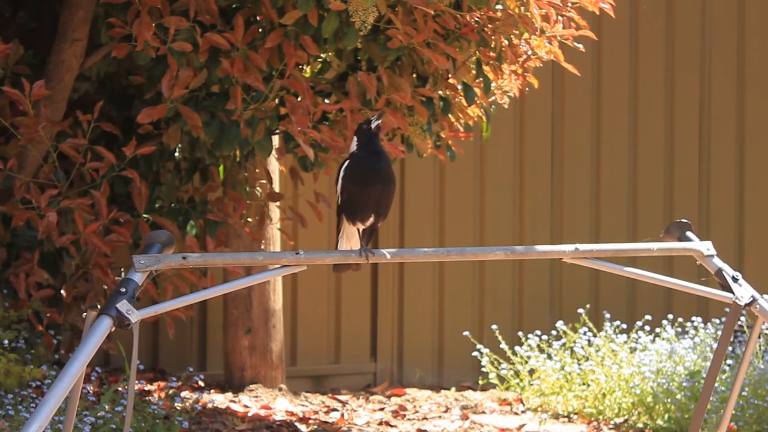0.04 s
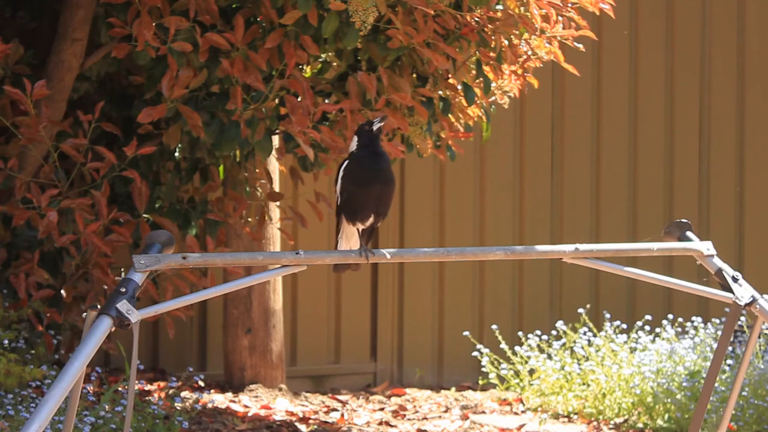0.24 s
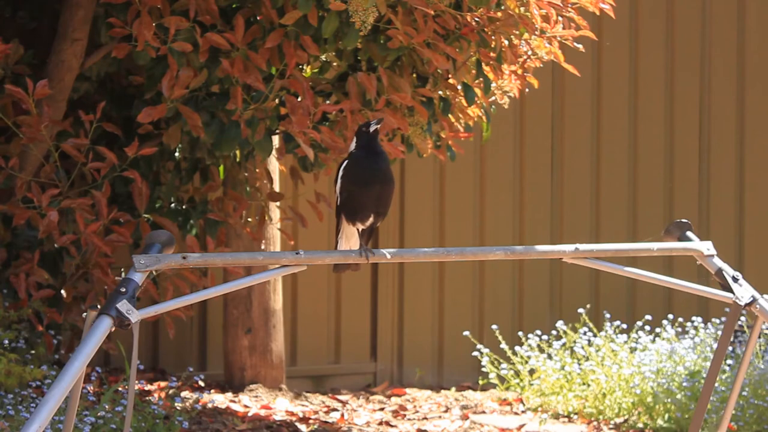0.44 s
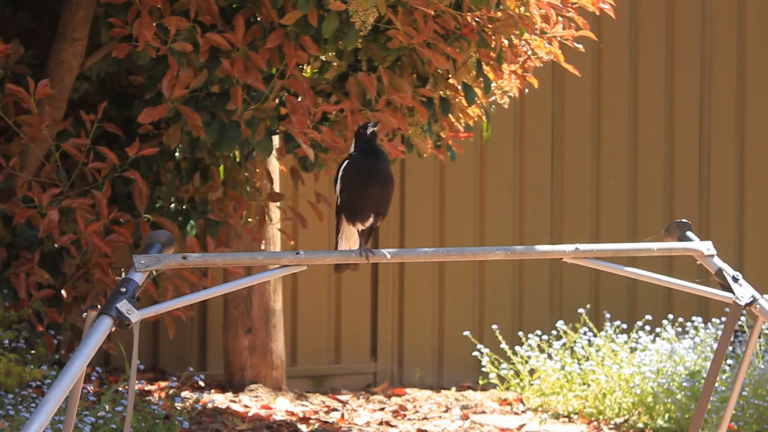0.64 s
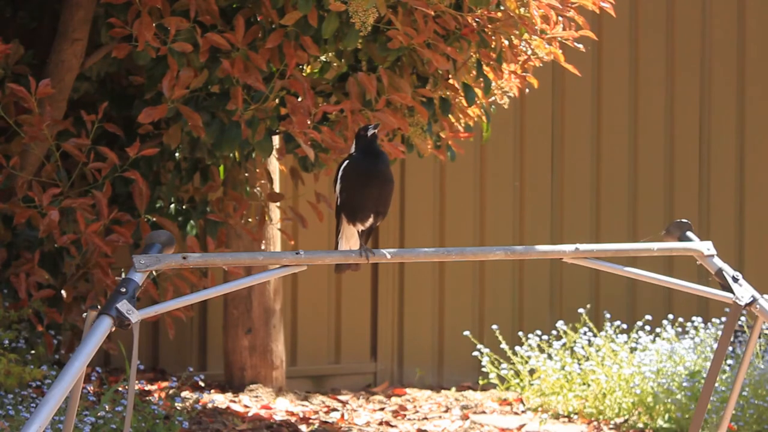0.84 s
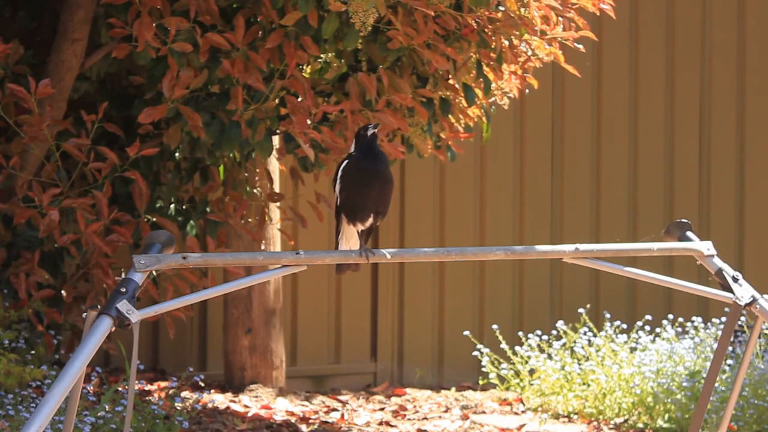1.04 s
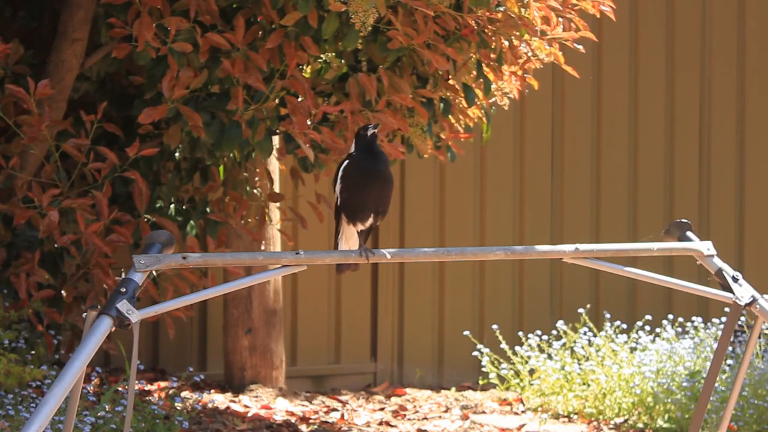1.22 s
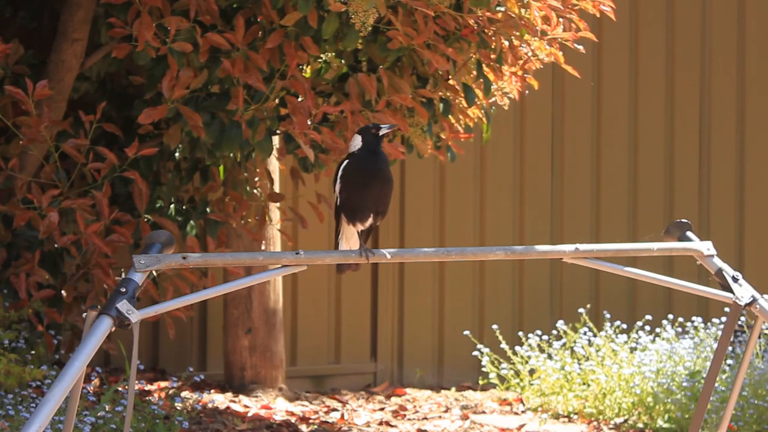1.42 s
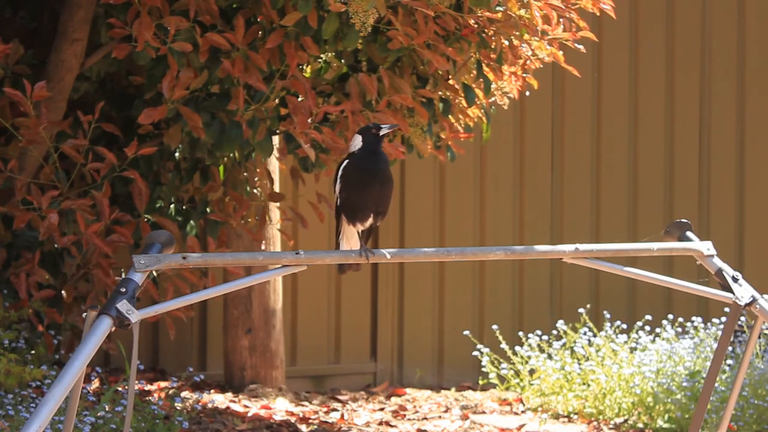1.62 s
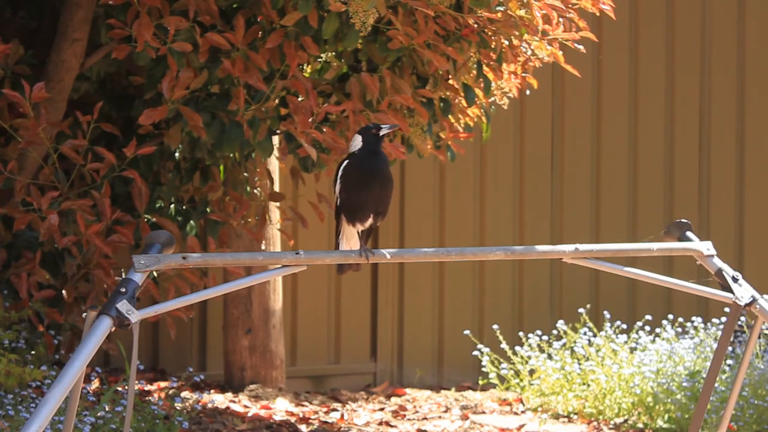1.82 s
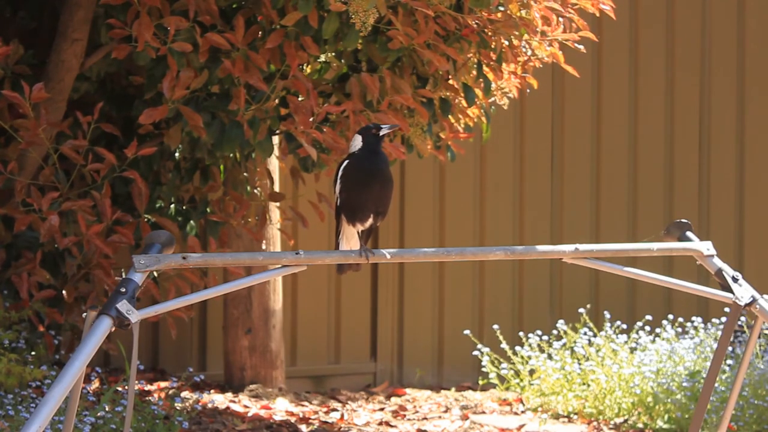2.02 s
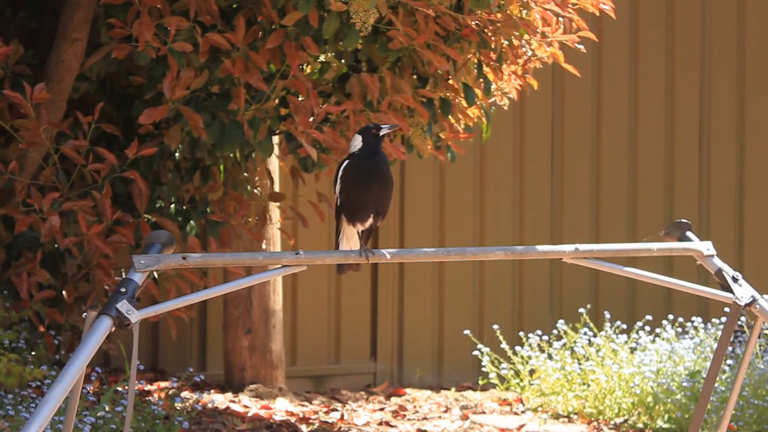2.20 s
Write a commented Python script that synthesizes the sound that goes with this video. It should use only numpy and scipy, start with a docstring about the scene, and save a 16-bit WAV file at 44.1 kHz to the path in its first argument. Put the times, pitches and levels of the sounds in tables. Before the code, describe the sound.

Already mid-song, a magpie pours out overlapping mellow low notes for under half a second, then softer, grainier high notes and one low note, then faint peeps; enclosed yard, quick dense echoes, quiet mono background.

```python
"""A magpie ends its warble: loud low flute notes from both sides of its voice box, then a quieter
tumble of higher notes. Each is a gliding sine under an arch of breath, some with throat-shaped overtones.
Thin level whistles are single sines, some from small birds, some high edges of the magpie's notes.
Fence and walls return every note as dense decaying echoes over a soft garden wash of filtered noise."""
import sys
import numpy as np
from scipy import signal
from scipy.io import wavfile
from scipy.ndimage import uniform_filter1d

SR = 44100
rng = np.random.default_rng(int(sys.argv[2]) if len(sys.argv) > 2 else 0)


def wav_record(signal):
    """Record a signal, one row per channel, as 16-bit PCM in the file named by sys.argv[1]."""
    frames = np.transpose(np.atleast_2d(signal))
    bounded = np.clip(frames, -1, 1)
    # unit amplitude maps onto the largest positive 16-bit level
    quanta = np.round(bounded * 32767).astype(np.int16)
    wavfile.write(sys.argv[1], SR, quanta)


def natural_amplitude(level_db):
    """Convert a level in decibels to a linear amplitude factor, elementwise."""
    exponent = np.asarray(level_db, float) / 20
    return 10 ** exponent


N = 99533


def unit_rms(x):
    """Scales to rms 1."""
    return x / np.sqrt(np.mean(np.abs(x) ** 2) + 1e-20)


def read_spectrum(points, hz):
    """Reads a spectrum table on a log-frequency axis."""
    point_hz, value = np.transpose(points)
    return np.interp(np.log(hz + 1), np.log(point_hz + 1), value)


def add(mix, start_s, sound):
    """Mixes a sound in at start_s; whatever falls outside the mix is cut."""
    at = round(start_s * SR)
    sound = sound[max(-at, 0):]
    part = mix[max(at, 0):][:len(sound)]
    part += sound[:len(part)]


def drift(size, hz):
    """Smooth random curve, up to roughly hz, rms about 1: noise through two moving averages."""
    width = max(round(SR / hz / 2), 1)
    curve = rng.standard_normal(SR // 4)
    for _ in range(2):
        curve = uniform_filter1d(curve, width, mode="wrap")
    return curve[:size] * np.sqrt(1.5 * width)


def overtones(hz, turn, top_hz, over_db, tilt_db, throat):
    """Harmonics of one membrane, filtered by the throat; jitter blurs the high ones most."""
    size = len(hz)
    jitter_rad = 0.06 * drift(size, hz=185)
    total = np.zeros(size)
    for k in range(2, int(15500 / top_hz) + 1):
        shape_db = read_spectrum(throat, k * hz) + tilt_db * np.log2(k / 2)
        rasp = 1 + natural_amplitude(-4) * drift(size, hz=500)
        total += natural_amplitude(over_db + shape_db) * rasp * np.sin(k * (turn + jitter_rad) + k * k)
    return total


def note(length_s, from_hz, to_hz, level_db, over_db=None, tilt_db=0, peak=0.38, throat=None,
         waver=0.0039, breath_db=-7, flutter_db=2.5):
    """One membrane glides under an arch of breath; its overtones pass the throat."""
    u = np.linspace(0, 1, round(np.clip(length_s, 0.01, 0.24) * SR))
    size = len(u)
    hz = (from_hz + (to_hz - from_hz) * u) * (1 + waver * drift(size, hz=41))  # waver: fraction of pitch
    turn = 2 * np.pi * np.cumsum(hz) / SR
    breath = natural_amplitude(breath_db) * drift(size, hz=185)  # airy edge around the pitch
    flutter = natural_amplitude(flutter_db * drift(size, hz=50.6))
    tone = natural_amplitude(level_db) * np.sin(turn) * (flutter + breath)
    if throat:
        tone += overtones(hz, turn, max(from_hz, to_hz), over_db, tilt_db, throat)
    warp = np.log(0.5) / np.log(np.clip(peak, 0.1, 0.9))  # puts the arch top at peak
    arch = np.abs(np.sin(np.pi * u ** warp)) ** 1.3
    return np.sqrt(2) * arch * tone


def loud_notes(mix):
    """Magpie, beak open: fundamentals clean, overtones rough."""
    # (start [s], length [s], pitch from [Hz], pitch to [Hz], level [dB], overtones [dB],
    #  tilt [dB per octave], peak place [0-1])
    loud = [(-.06, 0.2, 1002, 971, -25, -82, 11, 0.67), (.0, 0.16, 931, 916.3, -33, -48, -9.5, 0.43),
            (0.155, 0.105, 1885, 2082, -63.5, -47.5, -4, 0.57),
            (0.236, 0.058, 1057, 1008, -22.5, -58.5, 4, 0.12),
            (.247, .087, 971, 942, -16.5, -57, 4.5, 0.59), (0.331, 0.046, 995, 952.4, -25, -70, 7.5, 0.23)]
    # open throat response: (frequency [Hz], gain [dB])
    open_throat = [(1900, -0.5), (2900, -6.5), (3900, 3.5), (4850, -4.5), (5700, -5), (6600, -25),
                   (7600, -28.5), (8600, -10.5), (9300, -19), (10400, -42), (11500, -21), (12600, -9.5),
                   (13300, -23.5), (14200, -33)]
    for start_s, *row in loud:
        add(mix, start_s, note(*row, throat=open_throat, waver=0.002, breath_db=-24, flutter_db=0.7))


def quiet_notes(mix):
    """Magpie, beak half shut: notes a little grainy, through their own throat response."""
    # (start [s], length [s], pitch from [Hz], pitch to [Hz], level [dB], overtones [dB],
    #  tilt [dB per octave])
    quiet = [(0.512, 0.081, 2037, 2043, -62, -44.5, -16), (0.554, 0.1, 1870, 1980, -47.5, -59.5, 9.5),
             (0.581, 0.1, 2382, 2385, -39.5, -41.5, -14.5), (0.61, 0.069, 2984, 2921, -34, -39.5, 0),
             (0.646, 0.12, 2828, 2914, -42.5, -37, -4), (.65, 0.13, 2188, 2220, -46.5, -53, 9.5),
             (0.705, 0.076, 2337, 2330, -45.5, -51, -4), (0.857, 0.14, 1462, 1464, -47.5, -68, 6),
             (.922, 0.12, 1069, 1044, -31, -48.5, -4.5), (1.84, 0.11, 2965, 3200, -53, -35, -40)]
    # half-shut throat response: (frequency [Hz], gain [dB])
    half_shut_throat = [(2100, -12.5), (2900, 7), (3300, -29.5), (4200, 7), (4800, -10), (5800, -39.5),
                        (6600, -9.5), (7300, -0.5), (8800, -23.5), (11500, -37.5)]
    for start_s, *row in quiet:
        add(mix, start_s, note(*row, throat=half_shut_throat, breath_db=-14.5, flutter_db=1))


def pure_notes(mix):
    """Notes without overtones, with an airy edge: mostly the magpie, last a thin falling whistle."""
    # (start [s], length [s], pitch from [Hz], pitch to [Hz], level [dB])
    pure = [(-.04, 0.14, 1046, 1050, -27), (-.04, 0.064, 1313, 1326, -25.5), (.112, 0.061, 805, 770, -31.5),
            (0.152, 0.05, 720, 615, -44.5), (.17, 0.072, 850, 897, -33), (0.181, 0.09, 1212, 1400, -36),
            (0.241, 0.03, 2545, 2560, -45), (0.234, 0.037, 1425, 1596, -31.5),
            (.265, 0.041, 1520, 1466, -47), (0.31, 0.072, 1344, 1327, -39.5),
            (0.362, 0.035, 690, 620, -40.5), (.358, 0.07, 790, 765, -33), (0.385, 0.085, 1140, 1185, -34.5),
            (0.426, 0.02, 782, 766, -38.5), (0.499, 0.06, 806, 807, -46), (0.526, 0.12, 2065, 2190, -51),
            (.548, 0.06, 2780, 3050, -47), (0.555, 0.0856, 3940, 4160, -48),
            (0.611, 0.082, 2410, 2553, -44), (.655, 0.098, 2144, 2130, -49.5),
            (0.668, 0.089, 1150, 1165, -44.5), (.73, 0.054, 1175, 1170, -40.5),
            (0.736, 0.16, 1767, 1856, -60), (.893, 0.1, 1136, 1100, -46), (0.979, .08, 1835, 1830, -58.5),
            (0.982, 0.11, 773, 792, -52.5), (1.059, 0.053, 1045, 1050, -58), (1.068, 0.095, 754, 742, -49),
            (1.128, 0.115, 2050, 2105, -52.5), (1.151, 0.1, 759, 735.6, -47),
            (1.167, 0.128, 1040, 1250, -58), (1.285, 0.13, 1015, 900, -49.5),
            (1.372, 0.12, 3155, 3310, -57), (1.444, 0.0645, 3283, 3436, -39),
            (1.423, 0.063, 768, 784, -50.5), (1.906, 0.104, 3227, 3473, -48.5),
            (2.011, .055, 5870, 5500, -57)]
    for start_s, *row in pure:
        add(mix, start_s, note(*row))


def thin_whistles(mix):
    """Thin level whistles, some from small birds, some high edges of the magpie's notes."""
    # (start [s], length [s], held to 0.24 at most, pitch [Hz], level [dB])
    whistles = [(.83, 0.31, 4740, -64), (0.142, 0.072, 13300, -62.5), (0.52, 0.045, 6270, -64),
                (0.691, 0.084, 6856, -46), (0.92, 0.06, 7010, -43), (1.155, 0.14, 7125, -37.5),
                (1.192, 0.12, 6970, -50.5), (1.955, 0.087, 4413, -50.5), ]
    for start_s, length_s, hz, level_db in whistles:
        add(mix, start_s, note(length_s, hz, hz, level_db, waver=0.0052))


def yard_echoes(song):
    """Dense echoes from fence and walls, each band dying at its own speed."""
    gap_s, echo_db = 0.011, -9
    # decay time: (frequency [Hz], t60 [s])
    decay = [(700, 0.32), (2500, 0.34), (5000, 0.34), (13000, 0.14)]
    taps = rng.standard_normal(SR) * (rng.random(SR) < 2000 / SR)  # about 2000 reflections per second
    hz, t, z = signal.stft(taps, SR, nperseg=256)
    fade_db = -60 * t / read_spectrum(decay, hz)[:, None]
    tail = signal.istft(z * natural_amplitude(fade_db), SR, nperseg=256)[1]
    tail *= np.clip(np.arange(len(tail)) / (gap_s * SR) - 1, 0, 1)  # silent for one gap, rises over the next
    tail /= np.linalg.norm(tail)
    return natural_amplitude(echo_db) * signal.fftconvolve(song, tail)[:N]


def garden_wash():
    """Distant traffic and leaves: smooth noise with faint patches in time and frequency."""
    wash_db, patch_db = -55.5, -0.24
    # relative spectrum: (frequency [Hz], density [dB per Hz])
    spectrum = [(25, -42.5), (80, -5), (700, -4.5), (2000, -13), (4000, -17), (6000, -23), (15500, -32.5)]
    frames, hz = N // 512 + 5, np.fft.rfftfreq(2048, 1 / SR)
    real, imag, patches = rng.standard_normal((frames, 1025, 3)).T
    patches = uniform_filter1d(patches, size=20, axis=0)  # over frequency
    patches = unit_rms(uniform_filter1d(patches, size=8, axis=1))  # over time
    z = (real + 1j * imag) * natural_amplitude(read_spectrum(spectrum, hz)[:, None] + patch_db * patches)
    noise = signal.istft(z, nperseg=2048, noverlap=1536)[1][:N]
    return natural_amplitude(wash_db) * unit_rms(noise)


def scene():
    """Magpie notes and thin whistles, their echoes and the wash, in one channel."""
    song = np.zeros(N)
    loud_notes(song)
    quiet_notes(song)
    pure_notes(song)
    thin_whistles(song)
    return (song + yard_echoes(song) + garden_wash())[None]


def roll_off(x):
    """The treble ends steeply here."""
    return signal.sosfilt(signal.butter(12, 15710, fs=SR, output="sos"), x)


def record(dry):
    """Finishes the mix."""
    return roll_off(dry)


dry = scene()
out = record(dry)
wav_record(out)
```